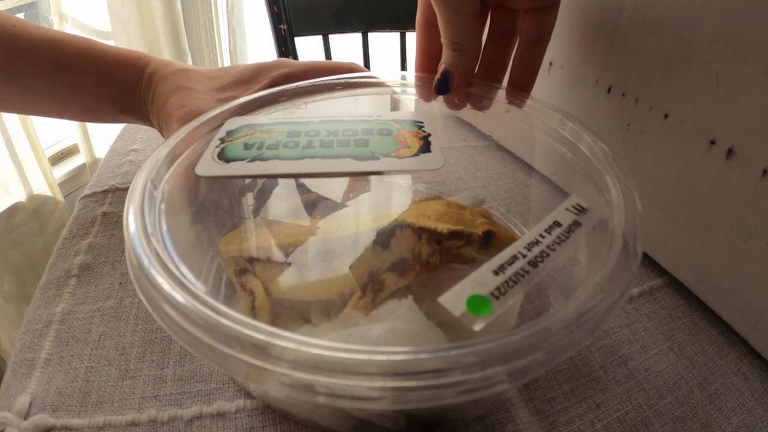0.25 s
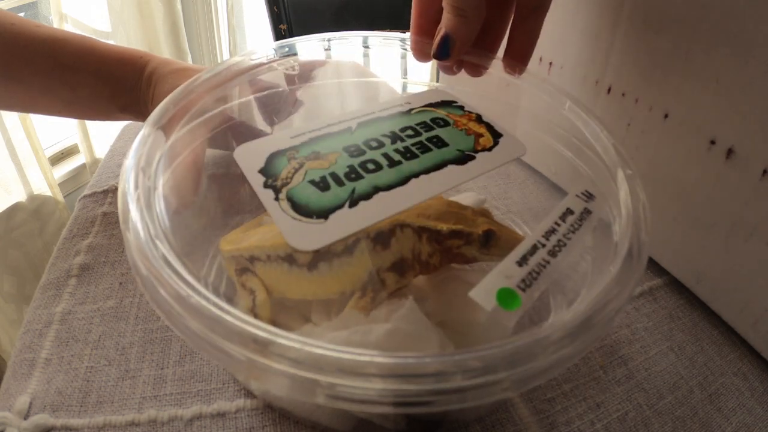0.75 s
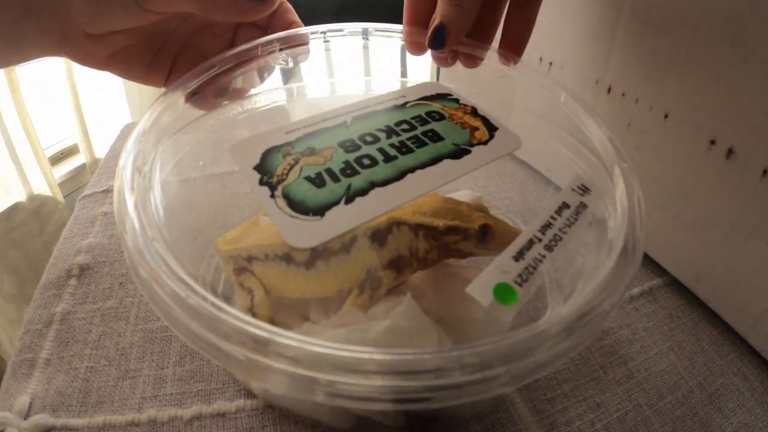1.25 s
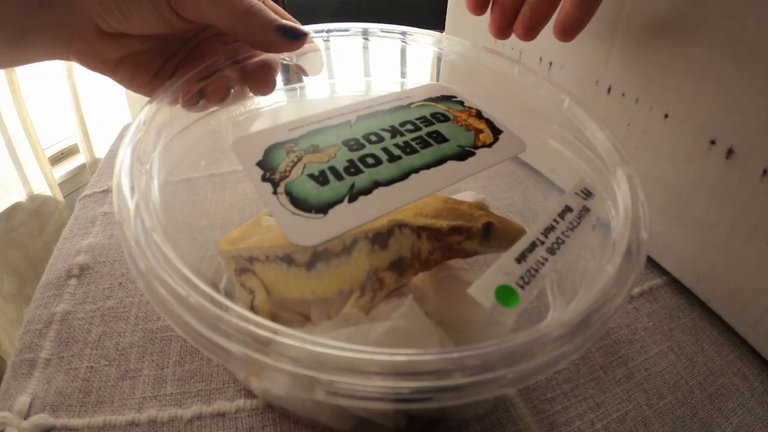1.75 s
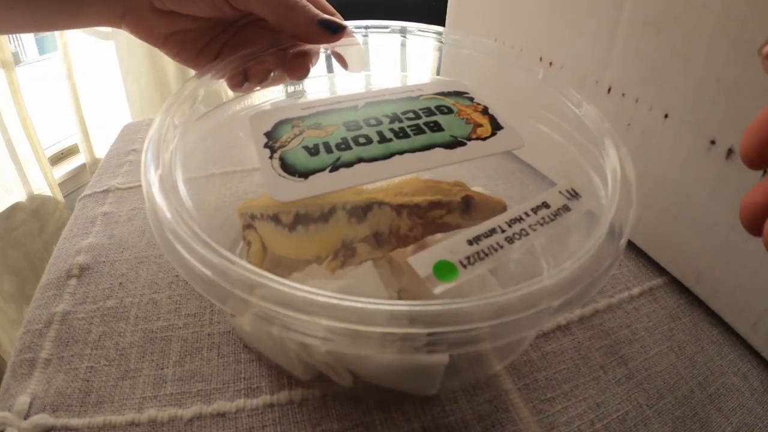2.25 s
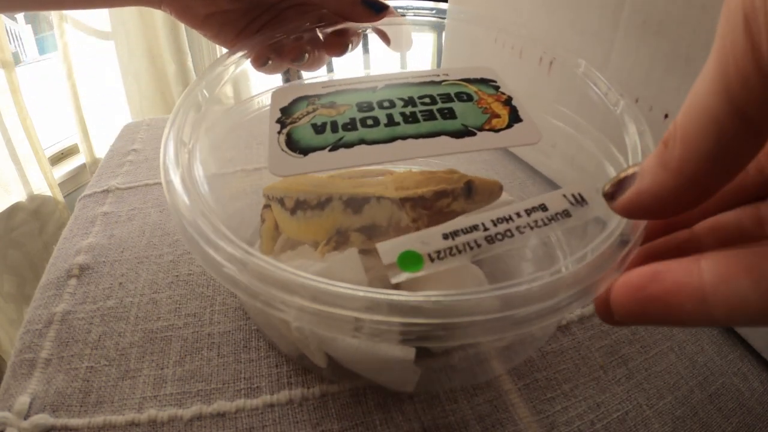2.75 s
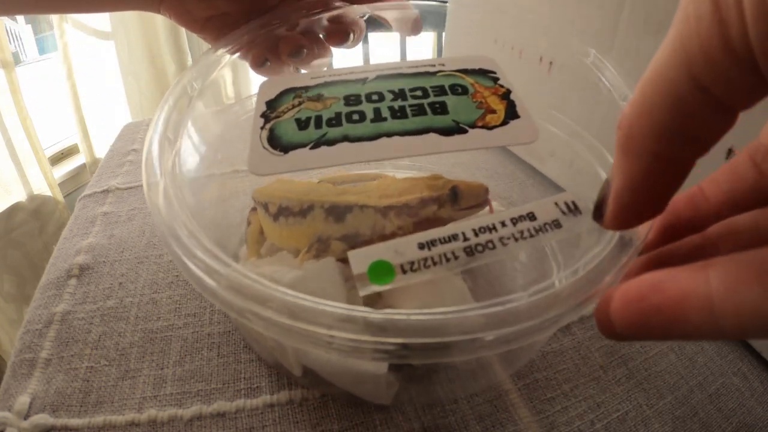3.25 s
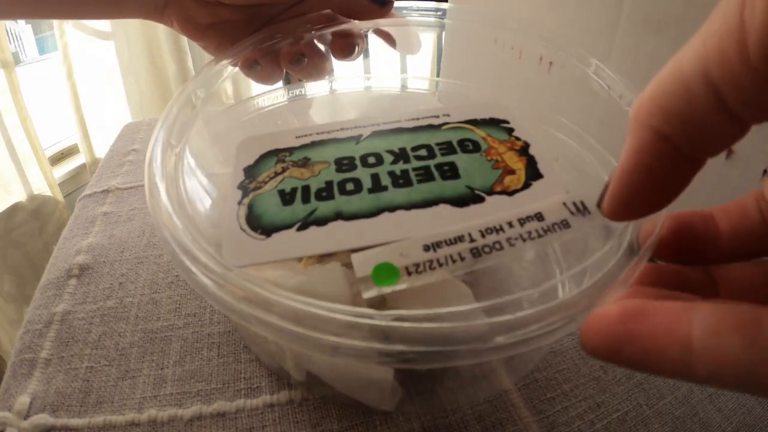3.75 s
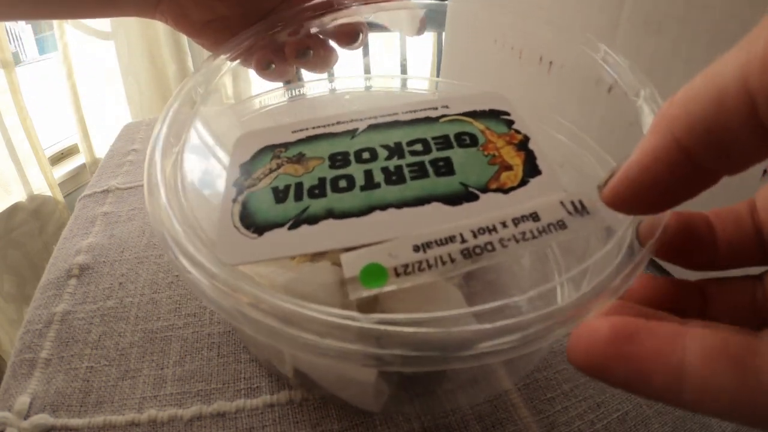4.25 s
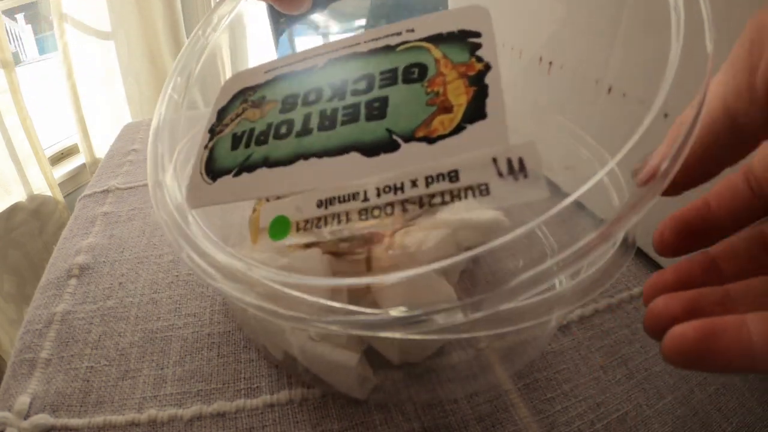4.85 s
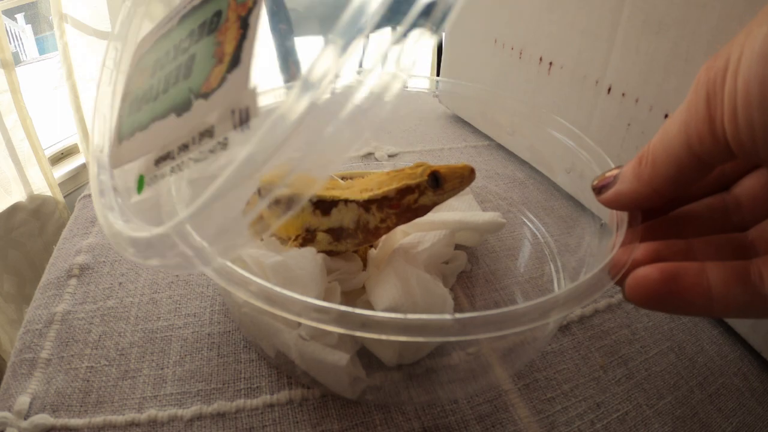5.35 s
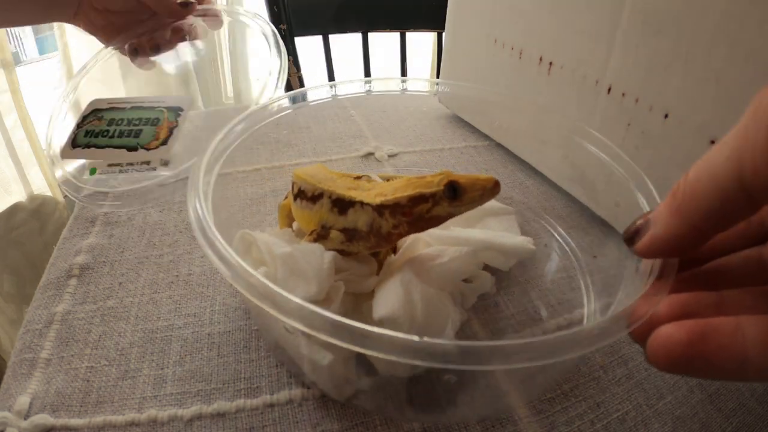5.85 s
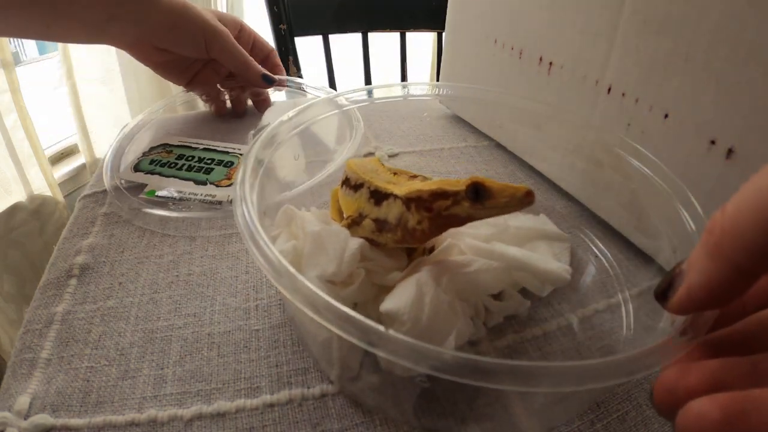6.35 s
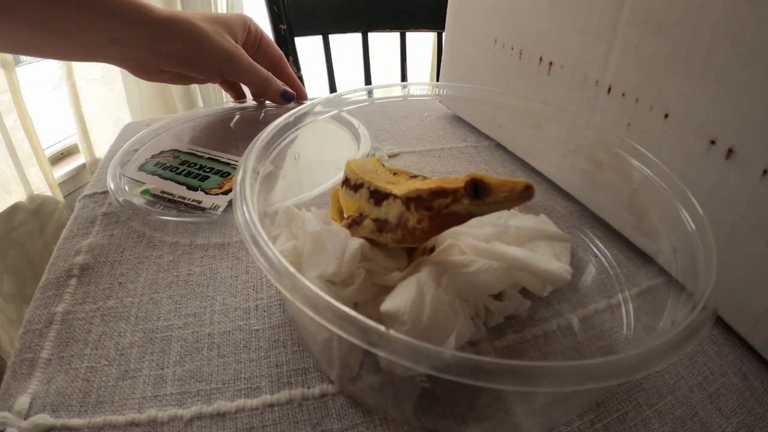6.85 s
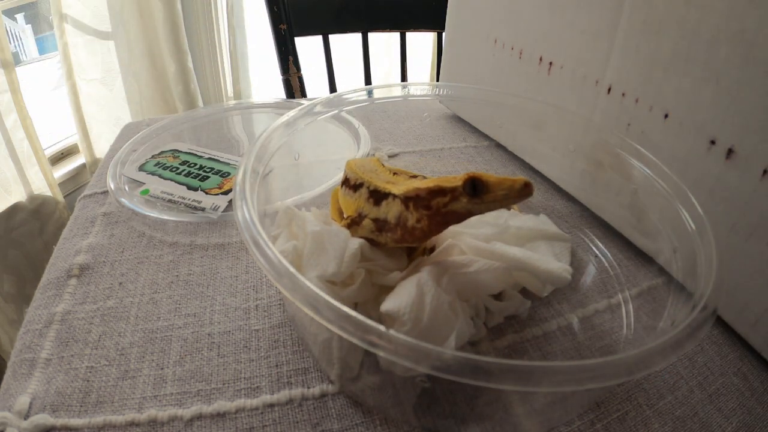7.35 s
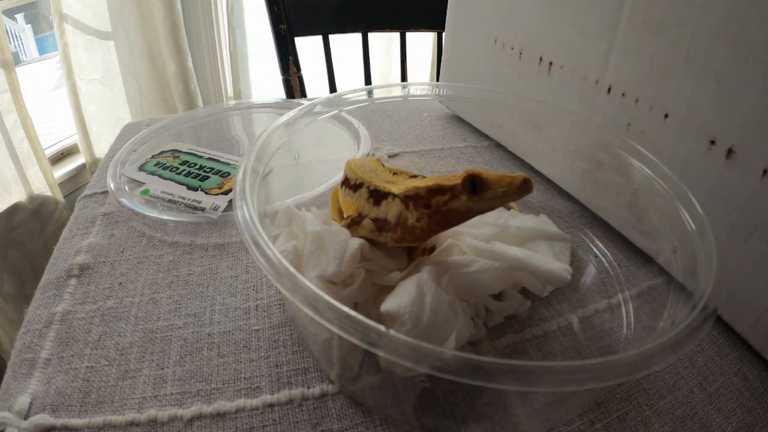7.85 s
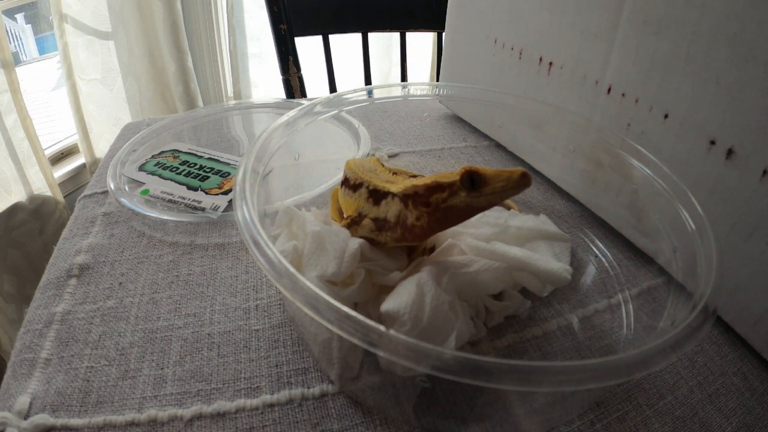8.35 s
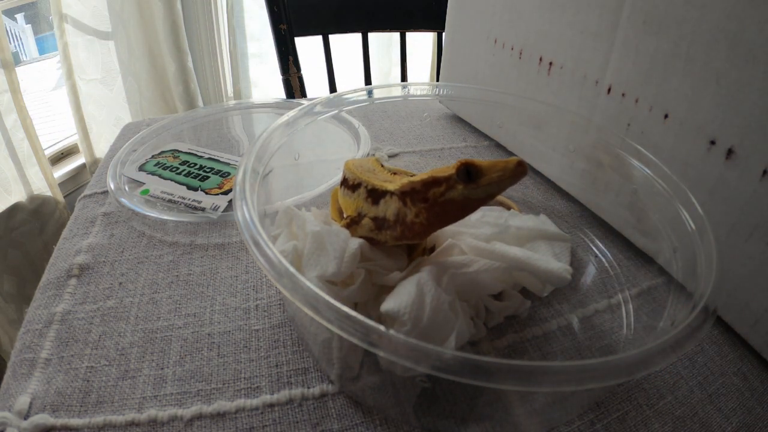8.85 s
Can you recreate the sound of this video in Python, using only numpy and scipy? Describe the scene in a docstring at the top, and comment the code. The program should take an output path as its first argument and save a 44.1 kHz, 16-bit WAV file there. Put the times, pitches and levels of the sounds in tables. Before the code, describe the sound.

Fingers turn a thin plastic tub on a cloth-covered table and pry its lid off with sharp snaps, hollow pops and gritty scrapes.

```python
"""Prying the lid off a plastic tub

Fingers turn a thin plastic tub on a cloth-covered table and pry its lid off, heard close up in stereo.
The rim snaps: noise bursts strike damped wall modes, and the air in the tub rings hollow.
Skin, plastic and cloth scrape as gritty filtered noise, low damped modes thud, narrow modes squeak.
Behind lie filtered room air and an appliance's wavering sines; a gain control ducks after loud pops."""
import sys
import numpy as np
from scipy import signal
from scipy.fft import rfft, irfft, next_fast_len
from scipy.io import wavfile
from scipy.ndimage import uniform_filter1d, map_coordinates

SR = 44100
rng = np.random.default_rng(int(sys.argv[2]) if len(sys.argv) > 2 else 0)


def to_wav(sig):
    """Store sig (one row per channel, or 1-D mono) as 16-bit WAV at the path in sys.argv[1].

    Samples outside -1..1 are clipped; the rate is SR.
    """
    pcm = np.clip(np.atleast_2d(sig), -1, 1) * 32767
    pcm = np.round(pcm).astype(np.int16)
    wavfile.write(sys.argv[1], SR, pcm.T)  # frames by channels


def nominal_scale(level):
    """Amplitude ratio for a level in decibels (scalar or array-like)."""
    x = np.asarray(level, float) / 20
    return 10 ** x


N = 400869  # length in samples

# the rim buckling, levels before the trims in the code:
# [t/s, crack level/dB, crack f/Hz, hollow ring over crack level/dB, treble over crack level/dB]
BUCKLES = [(0.1113, -29.5, 3300, -8.5, -6.5), (0.1485, -22.5, 1410, -8.5, -44), (0.15, -20, 2750, -24, -14),
           (0.195, -30.5, 1370, -2.5, -4), (0.2432, -34.5, 1330, 8, -19), (0.294, -31.5, 1297, 10.5, -10),
           (.4226, -59.5, 1370, 20.5, -11), (0.466, -35.5, 1188, 4.5, -15.5), (0.51, -46.5, 1066, 8, -20),
           (0.584, -32.5, 1190, 8, -19), (0.6202, -30, 1190, -2.5, -35.5), (0.6363, -11, 3015, -20.5, -18),
           (0.6387, -7.5, 1390, -4, -11.5), (0.6465, -20.5, 1266, -6.5, -25), (0.653, -25.5, 2220, 5, -25),
           (0.6664, -13, 2120, -1, -28), (0.6755, -25, 4900, -30, 3), (.737, -40, 2880, -17, -18),
           (0.9698, -31, 2800, -5.5, -21), (1.2136, -49, 2980, -8, -12.5),
           (1.4112, -26, 1644, -11.5, -13.5), (1.4208, -28.5, 1710, -8, -6), (1.539, -29, 5520, -30, -0.5),
           (1.557, -40, 5500, -30, 2), (1.5694, -24.5, 2460, 2, -32), (1.68, -32.5, 2956, -13, -13.5),
           (2.6964, -34.5, 1480, 3, -22.5), (2.799, -43.5, 1420, -5, -16), (2.84, -43, 1440, -14, 4),
           (2.9646, -32.5, 2200, -13, -20.5), (2.9966, -48, 1410, -6, -6), (3.1128, -46, 1500, -13, -7),
           (3.238, -36, 2126, -19, -23), (3.2792, -36, 2180, -8.5, -12), (3.361, -48, 1700, -25, -30),
           (3.421, -40, 2300, -13, -9), (3.4493, -49, 1740, -30, -18), (3.478, -43, 1490, 0.5, -17),
           (3.507, -30.5, 2120, -1, -26), (3.535, -58, 7500, -30, 5), (3.559, -48, 2940, -14, -4),
           (3.5907, -31.5, 1610, 2, -21), (3.698, -59, 7500, -30, 8), (3.708, -38, 1400, 2.5, -36),
           (3.7244, -38.5, 1700, 9.5, -30), (3.741, -43.5, 1370, 7.5, -21.5), (3.757, -39, 1770, 1, -19),
           (3.7927, -46.5, 1670, 0, -17), (3.834, -45.5, 2630, -3, -9), (3.8511, -40.5, 1757, -5.5, -21),
           (3.968, -20.5, 1830, -20, -6), (4.099, -16.5, 2790, -11, -5), (4.117, -49, 1980, -21.5, -18),
           (4.147, -53, 2530, -28, -1), (4.219, -11, 2980, -16, 3), (4.2308, -28, 2270, -4, -8),
           (4.2441, -19, 2117, -14, -31), (4.333, -48.5, 1700, -18.5, -17.5), (4.385, -45, 3270, -23, -15),
           (4.401, -47, 2800, -15, -15), (4.5193, -29.5, 2300, 5.5, -8), (4.6051, -23, 1470, 0.5, -16),
           (4.6254, -50, 1380, 14, 2), (4.6418, -19.5, 1983, -9, -9), (4.6758, -38, 1640, -1.5, -43),
           (4.805, -53, 1500, -11.5, -13), (4.858, -54.5, 1400, -1, -14), (4.885, -54, 1478, 4, -25),
           (5.133, -41.5, 1740, 1, -4), (5.226, -40.5, 1720, -2, -18.5), (6.0879, -45, 3160, -23, 11.5),
           (6.1564, -30.5, 3520, -25, -14), (6.2714, -27.5, 2830, -43, -35),
           (6.337, -40.5, 2510, -35, -2.5), (6.606, -34.5, 1740, -38, -33), (6.61, -34, 2980, -42, -35),
           (6.677, -43.5, 1699, -40, -26), (6.961, -43, 4500, -21, -7), (7.627, -51, 1372, -26, -27.5),
           (7.654, -47.5, 1240, -27, -24), (7.7505, -38, 2300, -14, 8), (7.771, -54, 1100, -25, -25),
           (7.79, -45.5, 1430, -26.5, -18), (8.047, -48, 1380, -8, -18), (8.083, -52, 1800, -7, -27),
           (8.0954, -43.5, 1410, -26.5, -28), (8.126, -39.5, 3920, -30, -12),
           (8.164, -43.5, 1110, -24, -26.5), (8.1951, -31.5, 4170, -20, -21),
           (8.2235, -41.5, 3920, -20.5, -12), (8.2356, -24, 3900, -28, -28),
           (8.2399, -29.5, 1500, -34, -21.5), (8.5382, -45, 1285, -28, -1)]


def snaps():
    """Each buckle: a burst of crack through the wall's modes, the air in the tub ringing, a fading shudder."""
    out, t = np.zeros((2, N + SR)), np.arange(SR // 8) / SR
    for start, db, crack_hz, hollow_db, treble_db in BUCKLES:
        crack = wall_crack(t, crack_hz, treble_db)
        hollow = tub_ring(t, start, db)
        sound = nominal_scale(db + 1.0) * (crack + nominal_scale(hollow_db + 6.0) * hollow)
        sound = sound + shudder(t, nominal_scale(db) * (0.33 * crack + nominal_scale(hollow_db + 5.5) * hollow))
        # each spot on the rim lies at its own distance from the two ports
        lag = rng.integers(1, 3)
        at = round(start * SR)
        out[0, at + lag:][:len(t)] += sound
        out[1, at:][:len(t)] += sound

    def radiation(hz):
        # a thin wall radiates no bass, soft plastic little top
        return (1j * hz / (1j * hz + 170)) ** 2 / (1 + 1j * hz / 13000)
    return filtered(out[:, :N], radiation)


def buckle_burst(t):
    """One clean jolt inside a ragged tear; the buckle takes a moment to run."""
    tear = rng.standard_normal(len(t)) * nominal_scale(-60 * t / .007) * (1 - np.exp(-t / .0006)) ** 2
    jolt = nominal_scale(-((t - .0009) / .00002) ** 2)  # 0.9 ms in, 1 dB down 0.02 ms to either side
    return .65 * tear / np.abs(tear).max() + jolt


# modes of the lid wall: [f/Hz, width/Hz, relative level/dB]
WALL_MODES = [(740, 150, -7.5), (1160, 430, -14.5), (1593, 950, -10), (2300, 550, 2), (2827, 687, 5.5),
              (3700, 1100, -4), (5000, 3200, 17.5), (7200, 1000, -7), (12000, 2100, -8)]


def wall_crack(t, crack_hz, treble_db):
    """The burst strikes the wall's damped modes; a crisp buckle drives the high ones harder."""
    burst = buckle_burst(t)
    modes = 0.38 * ring(crack_hz, 0.01, t, 0.0002)
    for hz, width, level in WALL_MODES:
        # modes near the buckle's own pitch are driven hardest
        drive_db = level + 2.0 * rng.standard_normal() - 11.2 * abs(np.log2(hz / crack_hz))
        if hz > 3300:
            drive_db += treble_db + 27.0
        decay = np.exp(-np.pi * width * t) * (1 - np.exp(-t * hz))
        modes = modes + nominal_scale(drive_db) * np.sin(2 * np.pi * hz * t) * decay
    wall = np.convolve(burst[:300], modes)[:len(t)]
    return wall / np.abs(wall).max() + nominal_scale(treble_db - 8) * np.diff(burst, prepend=0)


# the air in the tub rings higher as the gap under the lid widens: [t/s, f/Hz]
TUB_PITCH = [(0, 400), (.15, 567), (.2, 492), (.245, 462), (.295, 538), (.42, 514), (.47, 482), (.51, 448),
             (.585, 574), (.62, 507), (.64, 555), (1, 562), (1.41, 491), (1.5, 590), (2.7, 577), (2.8, 694),
             (3.28, 690), (3.5, 620), (3.6, 597), (3.71, 452), (3.76, 460), (3.97, 640), (4.1, 580),
             (4.52, 600), (4.6, 530), (4.64, 612), (5.2, 471), (9, 520)]
# modes of that air: [f over the main ring, share, t60/s]
AIR_MODES = [(.95, 1.1, 0.03), (1.13, 0.6, .03), (1.5, .25, 0.016), (.76, 0.19, 0.035), (2.3, 0.1, 0.014)]
RISE_PER_DB, FIRM_DB = .015, -28  # a harder buckle flexes the lid open: share of pitch per dB above firm
TUB_SCATTER = .02  # each spot on the rim shifts the ring a little: share of pitch


def tub_ring(t, start, db):
    """The enclosed air answers a buckle with a few damped modes."""
    rise = RISE_PER_DB * max(db - FIRM_DB, 0) + TUB_SCATTER * rng.standard_normal()
    main_hz = np.interp(start, *np.transpose(TUB_PITCH)) * (1 + rise)
    return sum(share * nominal_scale(2.0 * rng.standard_normal()) * ring(main_hz * ratio, t60, t, 0.0017)
               for ratio, share, t60 in AIR_MODES)


def shudder(t, blow):
    """The loose lid shudders on after a buckle: fading noise rings with the blow's first 5 ms."""
    rattle = rng.standard_normal(len(t)) * nominal_scale(-60 * t / .1) * (1 - np.exp(-t / 0.0052))
    return nominal_scale(-33.5) * signal.fftconvolve(rattle, blow[:SR // 200])[:len(t)]


# the tub or a hand landing on the table, level before a trim: [t/s, level/dB, f/Hz, t60/s]
LANDINGS = [(.112, -38.5, 147, 0.046), (0.191, -35, 199.5, 0.051), (0.294, -28.5, 216.4, 0.032),
            (0.639, -13, 152.3, 0.03), (0.65, -28, 70, 0.17), (0.659, -35.5, 38.06, 0.2),
            (0.669, -22.5, 167.3, 0.022), (0.681, -23.5, 148, 0.042), (0.972, -48.5, 150, 0.059),
            (1.426, -39.5, 200, 0.031), (1.456, -41, 91, 0.051), (1.573, -41.5, 100.7, 0.098),
            (1.715, -52.5, 80, 0.089), (3.282, -50, 169, 0.0414), (3.477, -46.5, 169.3, 0.16),
            (3.592, -35, 157.7, 0.06), (3.608, -42, 120, 0.14), (3.708, -40.5, 119.5, 0.0523),
            (3.728, -27, 72.4, 0.047), (3.758, -40, 60, 0.024), (3.998, -68, 100.3, 0.12),
            (4.218, -46, 149.8, 0.1), (4.25, -46.5, 75.4, 0.14), (4.5, -50.5, 60, 0.12),
            (4.519, -48, 238, 0.17), (4.621, -48.5, 70.3, 0.11), (4.607, -40, 165, 0.033),
            (5.135, -44.5, 77, 0.12), (5.168, -41, 79, 0.07), (5.224, -48.5, 118.6, 0.034),
            (6.159, -39.5, 145, 0.096), (7.86, -59.5, 61.93, 0.18), (6.608, -48, 139.6, 0.098),
            (8.196, -42.5, 293, 0.026)]


def thuds():
    """Soft contacts shake the table top: a low damped mode and a fainter one above it."""
    out, t = np.zeros(N + SR), np.arange(SR // 3) / SR
    for start, db, hz, t60 in LANDINGS:
        blow = ring(hz, t60, t, 0.00068) + 0.32 * ring(hz * 2.1, t60 * 0.95, t, 0.0029)
        out[round(start * SR):][:len(t)] += nominal_scale(db + 7.0) * blow
    return out[:N]


# spectra of the rubbing layers: [f/Hz, relative level/dB]
SCRAPE_COLOUR = [(600, -34), (1200, -9.5), (1800, -1.5), (2400, -1.5), (3300, -1.5), (4200, -6.5),
                 (6000, -38)]
FIZZ_COLOUR = [(2800, -50), (4200, -5), (5500, -11), (7500, -7.5), (10000, -16), (12500, -30),
               (15500, -41.5)]
CLOTH_COLOUR = [(2800, -43.5), (4200, -6.5), (6000, -6.5), (8000, -10), (10500, -17.5), (13000, -23.5),
                (15500, -40.5)]  # soft hiss of the weave
HOLLOW_COLOUR = [(90, -42), (150, 4.5), (280, 3.5), (450, 6), (600, 3.5), (750, -6.5), (1100, -8),
                 (1600, -4.5), (2500, -41)]
TABLE_COLOUR = [(15, -15), (35, 12), (70, -4), (130, 9.5), (220, -59)]
# sounds on the table: [f/Hz, left-right likeness]
NEAR_LIKENESS = [(60, 0.9), (1000, 0.89), (4000, 0.33), (12000, 0.63)]
# the place of contact sets where the rubbed plastic sings: [t/s, f/Hz]
CONTACT_PITCH = [(0, 1640), (.1, 1680), (.3, 1430), (.86, 1660), (0.948, 2696), (1.42, 1453), (1.49, 1542),
                 (1.52, 1690), (1.55, 1700), (1.6, 1494), (1.75, 2820), (2.63, 1490), (2.899, 2060),
                 (3.25, 2100), (3.42, 2180), (3.53, 2170), (3.65, 1610), (4.0, 2330), (4.5, 2300),
                 (4.599, 1730), (5.2, 1930), (5.4, 2850), (6.05, 3200), (6.09, 2500), (6.2, 2450),
                 (6.34, 2500), (6.5, 2376), (6.6, 2450), (6.7, 2300), (6.8, 2300), (7.0, 2821), (7.4, 1514),
                 (8.2, 1540)]
# faint stirring between strokes: [level/dB] of scrape, brightness, hollow body
STIRRING = [-102.5, -88.5, -67.5]
SHEEN_HZ = 5400  # upper resonance of the rubbed plastic
RUMBLE_DB, RUMBLE_GROWS, RUMBLE_S = -88, 1.9, 0.11  # table at rest, dB per dB of hollow body, averaging time
LET_GO_S = 6.4  # the hands stop pushing the tub about; the table lies still
WALL_DB, WALL_SHARP = -2.5, 0.47  # wall modes in a scrape: height over flat, width over a struck mode's


def rubs():
    """Skin, plastic and cloth slide in uneven slips; tub and table take up the motion."""
    quick = skids()
    slow = nominal_scale(STIRRING)[:, None] ** 2 + strokes()
    scrape, hollow = np.sqrt(quick + slow)[::2]
    fizz, cloth = np.sqrt(quick[1]), np.sqrt(slow[1])

    # the table follows the hollow body sluggishly, and by 36 dB at most
    load_db = 20 * np.log10(uniform_filter1d(hollow, size=round(RUMBLE_S * SR)) / nominal_scale(STIRRING[2]))
    pushed = np.arange(N) < LET_GO_S * SR
    table_db = RUMBLE_DB + 36 * np.tanh(RUMBLE_GROWS * load_db / 36) * pushed
    grip_db = 1.9 * wobble(60) + 2.3 * wobble(250)

    def wall(f):
        return 1 + sum(nominal_scale(WALL_DB) / (1 + ((f - hz) / (WALL_SHARP * width)) ** 2)
                       for hz, width, _ in WALL_MODES)
    creak_noise = unit(filtered(rush(SCRAPE_COLOUR, NEAR_LIKENESS, 1200, 5), wall))
    creak_noise = sung(creak_noise, CONTACT_PITCH, octaves=0.15, peak_db=0.5, below_db=18.5, patchy_db=2.5)
    fizz_noise = sung(rush(FIZZ_COLOUR, NEAR_LIKENESS, 540, 5.8), [(0, SHEEN_HZ)],
                      octaves=0.22, peak_db=10, below_db=2.5, patchy_db=3.0)
    cloth_noise = rush(CLOTH_COLOUR, NEAR_LIKENESS, 300, 5.8)
    hollow_noise = rush(HOLLOW_COLOUR, NEAR_LIKENESS, 120, 16.0)
    table_noise = rush(TABLE_COLOUR, NEAR_LIKENESS)

    out = scrape * nominal_scale(grip_db) * creak_noise
    out = out + fizz * nominal_scale(grip_db + 1.2 * wobble(89)) * fizz_noise
    out = out + cloth * nominal_scale(0.6 * wobble(23)) * cloth_noise
    out = out + hollow * nominal_scale(0.13 * grip_db + 1.1 * wobble(53)) * hollow_noise
    return out + nominal_scale(table_db + 5.1 * wobble(9.1)) * table_noise


# short skids of skin or rim:
# [t/s, length/s, scrape level/dB, brightness over scrape level/dB, hollow body over scrape level/dB]
SHORT_SKIDS = [(0.091, 0.014, -60, 2, 17), (0.19, 0.011, -44.5, -8.5, 8.5), (0.206, 0.027, -61, -1, -8),
               (0.276, 0.027, -69, 1.5, -10), (0.363, 0.023, -69.5, 0.5, 20), (0.635, 0.03, -34.5, -6, 8),
               (0.659, 0.031, -38.5, -3.5, 9.5), (0.679, 0.082, -53, -8, 14),
               (.745, 0.086, -61.5, -13.5, 6), (0.782, 0.035, -72, 2, -1), (0.82, 0.045, -67, 0, 7),
               (0.959, 0.029, -51, -8.5, -1), (0.99, 0.028, -59.5, -9, 7.5), (1.409, 0.075, -50, -12, -1),
               (1.509, 0.044, -50.5, 4.5, -1.5), (1.552, 0.024, -54.5, 4, -12),
               (1.667, 0.054, -62, 2.5, -12), (2.9, 0.065, -54, -3, 4.5), (2.965, 0.02, -61, -12, 4),
               (3.21, 0.15, -68.5, -22, 3), (3.39, 0.021, -66, -17, -4), (3.239, 0.0278, -60, -4, 8),
               (3.269, 0.032, -61.5, -17, 7), (3.417, 0.028, -64, -2, 1), (3.48, 0.051, -64, -10, 15.5),
               (3.493, 0.042, -57, -14.5, 13.5), (3.57, 0.025, -58, -1, 6.5),
               (3.589, 0.014, -48, -10, -1.5), (3.603, 0.0431, -56, -3.5, 10), (3.7, 0.074, -59, -5, 14.5),
               (3.842, 0.062, -63.5, -7, 6.5), (3.991, 0.054, -45.5, -2.5, -0.5),
               (3.998, 0.028, -37.5, -2, -21), (4.03, 0.032, -61, -2, 8.5), (4.052, 0.0098, -40.5, -8, -5),
               (4.071, 0.0072, -52.5, 1, 6), (4.185, 0.021, -68, 4, 13.5), (4.203, 0.059, -49.5, -2, 8),
               (4.223, 0.0062, -41, 9, -18), (4.241, 0.013, -35, -18, -17.5),
               (4.257, 0.051, -47.5, -15, -10), (4.353, 0.022, -53.5, -14, -16), (4.373, 0.024, -62, -5, 2),
               (4.353, 0.099, -74.5, -2, 19.5), (4.483, 0.03, -54, -11, 4),
               (4.51, 0.0086, -39, -13.5, -5.5), (4.585, 0.022, -54, -10, -2), (5.121, 0.05, -56, -5, 3.5),
               (5.248, 0.021, -66, -6, 1.5), (5.393, 0.067, -63, -3.5, -17),
               (6.01, 0.045, -54.5, -2, -20.5), (6.11, 0.099, -57.5, 1.5, -12),
               (6.189, 0.18, -54, -1.5, -27), (6.287, 0.096, -50.5, -11, -21),
               (6.32, 0.062, -50.5, -6, -25.5), (6.445, 0.032, -59, -3, -18.5),
               (6.462, 0.037, -47.5, -7.5, -23), (6.494, 0.037, -46, -2, -20),
               (6.52, 0.121, -52, -7.5, -34), (6.626, 0.16, -60, 1.5, -29.5),
               (6.664, 0.1, -53.5, -10.5, -31.5), (6.792, 0.072, -63, -5.5, -21),
               (6.939, 0.072, -68.5, -1.5, -11.5), (7.52, 0.128, -73, -14, -1.5), (7.62, 0.052, -75, 0, -8),
               (7.705, 0.03, -64.5, -4, 1), (8.093, 0.077, -68, -14, -9.5), (8.118, 0.046, -66, 1.5, -11.5),
               (8.22, 0.012, -50.5, -13, -3), (8.232, 0.019, -46.5, -6.5, 2.5)]
EDGE_S, EDGE_SHARE = 0.0024, 0.093  # grip and release time; longer skids add this share of their length
SKID_TOP, SKID_SAG_DB = 0.36, 11.5  # loudest point 0-1, fall over a whole length


def skids():
    """Power of scrape, brightness and hollow body during each skid: a quick grip, a swell, a quick release."""
    power = np.zeros((3, N))
    for start, length, db, fizz_db, hollow_db in SHORT_SKIDS:
        u = np.linspace(0, 1, round(length * SR))
        edge = EDGE_S + EDGE_SHARE * length
        shape = np.clip(np.minimum(u, 1 - u) * length / edge, 0, 1)
        shape = shape * nominal_scale(-SKID_SAG_DB * abs(u - SKID_TOP))
        levels = nominal_scale([[db], [db + fizz_db], [db + hollow_db]])
        at = round(start * SR)
        power[:, at:at + len(u)] += (levels * unit(shape)) ** 2
    return power


# slow strokes of hands, tub and lid over the cloth:
# [t/s, length/s, scrape level/dB, brightness over scrape level/dB, hollow body over scrape level/dB]
SLOW_STROKES = [(-.12, 0.294, -49.5, -15.5, 8.5), (0.101, 0.31, -68, -7, 8.5),
                (0.332, 0.31, -86, -13.5, 23.5), (0.6, 0.19, -58.5, -14, 10), (0.848, 0.21, -68, -1.5, 3),
                (1.384, 0.27, -56.5, -9.5, -0.5), (1.661, 0.092, -66, -5, 12), (1.95, 1, -75, 5, 6.5),
                (2.836, 0.477, -74.5, 0, 8), (3.13, 0.782, -70, -2.5, 9.5), (3.79, 0.47, -63, -10, 5.5),
                (4.191, 0.19, -58.5, -10.5, 2), (4.395, 0.4555, -64, -1, 4.5), (4.692, 0.47, -75.5, 3, 7),
                (5.076, 0.25, -70, -5.5, 6.5), (5.393, 1, -75, 2.5, -20), (5.964, 0.52, -58.5, -3.5, -7.5),
                (6.344, 0.51, -53, -15, -34), (7.39, 0.32, -69, -7.5, 3.5), (7.565, 0.336, -71, 1.5, 10),
                (8.046, 0.14, -68, -12, 3), (8.094, 0.24, -59.5, -4.5, -0.5), (8.451, 0.52, -83, -3, 13)]


def strokes():
    """Power of the same three layers during each stroke: one smooth swell."""
    power = np.zeros((3, N))
    for start, length, db, fizz_db, hollow_db in SLOW_STROKES:
        at = np.arange(max(round(start * SR), 0), round((start + length) * SR))
        # a higher exponent makes a more peaked swell
        swell = np.sin(np.pi * (at / SR - start) / length).clip(0) ** 1.1
        levels = nominal_scale([[db], [db + fizz_db], [db + hollow_db]])
        power[:, at] += (levels * swell) ** 2
    return power


def sung(x, path, octaves, peak_db, below_db, patchy_db):
    """x through a resonance on the (s, Hz) path, thin below it; narrow wall modes come and go."""
    hz, t, z = signal.stft(x, SR, nperseg=512)
    off = np.log2((hz[:, None] + 1) / np.interp(t, *np.transpose(path)))  # octaves from the path
    patches = uniform_filter1d(rng.standard_normal(off.shape), size=2, axis=0)
    patches = unit(uniform_filter1d(patches, size=9, axis=1))
    resonance = 1 + nominal_scale(peak_db) / (1 + (off / octaves) ** 2)
    gain = resonance * nominal_scale(below_db * np.clip(off + 0.2, -.7, 0) + patchy_db * patches)
    # hold the overall level while the colour moves
    share = np.mean(abs(z) ** 2, axis=(0, 2))[:, None]
    gain = gain / np.sqrt(np.sum(share * gain ** 2, axis=0) / share.sum())
    return signal.istft(z * gain, SR, nperseg=512)[1][:, :N]


# a nail or the rim catches and one wall mode squeaks: [t/s, length/s, f/Hz, level/dB]
CATCHES = [(0.062, 0.07, 1650, -56), (1.426, 0.072, 3000, -54.5), (3.202, 0.13, 2189, -65.5),
           (3.384, .04, 2043, -58.5), (3.51, 0.021, 2200, -53), (5.25, 0.0174, 1650, -66),
           (5.409, 0.0283, 2450, -64.5), (6.289, .07, 1090, -70), (6.482, .05, 1040, -69),
           (6.659, 0.114, 3360, -54.5), (8.085, 0.093, 1480, -64)]


def squeaks():
    """Uneven slips keep one narrow mode singing under a smooth swell."""
    out = np.zeros(N)
    for start, length, hz, db in CATCHES:
        t = np.arange(round(length * SR)) / SR
        mode = np.sin(2 * np.pi * hz * t) * np.exp(-np.pi * 110 * t)  # 110 Hz wide
        sing = signal.fftconvolve(rng.standard_normal(len(t)), mode)[:len(t)]
        swell = np.sqrt(np.sin(np.pi * t / length).clip(0))
        out[round(start * SR):][:len(t)] += nominal_scale(db) * unit(sing * swell)
    return out


# decay of the room: [f/Hz, t60/s]
ROOM_DECAY = [(150, 0.29), (1000, 0.1), (4000, 0.072), (12000, 0.091)]


def room(x):
    """The room's answer: decaying noise 3 ms behind, a fresh tail for every half second."""
    out, step, delay = np.zeros((2, N + SR)), SR // 2, 130
    for start in range(0, N, step):
        hz, t, z = signal.stft(rng.standard_normal((2, SR // 2)), SR, nperseg=256)
        decay = nominal_scale(-60 * t / along(ROOM_DECAY, hz)[:, None])
        tail = signal.istft(z * decay, SR, nperseg=256)[1]
        tail = tail / np.linalg.norm(tail[0])
        wet = signal.fftconvolve(x[None, start:start + step], tail, axes=1)
        at = start + delay
        out[:, at:at + wet.shape[1]] += wet[:, :N + SR - at]
    return out[:, :N]


# spectrum of the room air: [f/Hz, relative level/dB]
AIR_COLOUR = [(15, -57), (25, -13.5), (66, -17.5), (107, -29.5), (169, 2), (260, -8), (297, -11.5),
              (331, -40.5), (523, -41), (666, -33), (2700, -30.5), (3000, -27.5), (3720, -34.5),
              (7500, -36.5), (15500, -60.5)]
# room air: [f/Hz, left-right likeness]
AIR_LIKENESS = [(60, 0.94), (240, 0.93), (950, 0.42), (3770, 0.24), (15000, 1)]
# an appliance's partials: [f/Hz, level/dB, pitch waver/Hz, flutter knots per s]
HUM_PARTIALS = [(178.2, -70.5, 3, 8), (300.7, -73, 2.3, 9.1), (529, -70, 1.96, 21), (597, -85.5, 3.3, 18),
                (2980, -81.5, 35, 180)]
AIR_DB, DRAUGHT_DB, FLUTTER_DB = -62, 1, 2.2  # air level, unsteadiness of the air and of the hum


def air():
    """Room air as filtered noise, and an appliance's wavering hum and whine as sines."""
    hum = np.zeros(N)
    for hz, db, waver_hz, rate in HUM_PARTIALS:
        phase = 2 * np.pi * np.cumsum(hz + waver_hz * wobble(40)) / SR
        hum += np.sqrt(2) * nominal_scale(db + FLUTTER_DB * wobble(rate)) * np.sin(phase)
    return nominal_scale(AIR_DB + DRAUGHT_DB * wobble(3.8)) * rush(AIR_COLOUR, AIR_LIKENESS) + hum


def unit(x):
    """Scaled to rms 1."""
    return x / np.sqrt(np.mean(x ** 2) + 1e-20)


def along(points, hz):
    """(Hz, value) points read on a log axis."""
    f, v = np.transpose(points)
    return np.interp(np.log(hz + 1), np.log(f + 1), v)


def filtered(x, response):
    """x times a response of frequency."""
    m = next_fast_len(N + SR // 2)
    return irfft(rfft(x, m) * response(np.fft.rfftfreq(m, 1 / SR)), m)[..., :N]


def wobble(rate):
    """A smooth random curve, rate knots a second."""
    knots = rng.standard_normal(int(N * rate / SR) + 4)
    return map_coordinates(knots, [np.arange(N) * rate / SR])


def ring(hz, t60, t, attack):
    """One damped mode."""
    return np.sin(2 * np.pi * hz * t) * nominal_scale(-60 * t / t60) * (1 - np.exp(-t / attack))


def rush(spectrum, alike, rate=0, grain_db=0):
    """Stereo noise of rms 1; sparse slips of random size, rate a second, ride on it."""
    pair = rng.standard_normal((2, N))
    size_db = grain_db + 3 * np.minimum(rng.exponential(size=N), 3)
    slips = (rng.random(N) < rate / SR) * nominal_scale(size_db) * rng.choice([-1, 1], N)
    return unit(spread(pair + slips, alike, spectrum))


def spread(pair, alike, spectrum=((1, 0), (2, 0))):
    """Two signals coloured and mixed as mid and side to a left and right of the given likeness."""
    def mid_side(hz):
        turn = np.arccos(np.clip(along(alike, hz), -1, 1)) / 2
        return nominal_scale(along(spectrum, hz)) * [np.cos(turn), np.sin(turn)]
    mid, side = filtered(pair, mid_side)
    return np.array([mid + side, mid - side])


# spread-out sounds at the microphone ports: [f/Hz, phase by which left leads/rad]
PORT_LEAD = [(0, 0), (550, -0.7), (900, -.8), (3000, -.75), (5000, -.05), (15300, 0)]


def scene():
    """Near sounds a little to the right, their room, and spread-out rubbing and air, late at the left port."""
    hits = snaps() + thuds() + squeaks()
    side = np.array([[1], [-1]])
    wide = filtered(rubs() + air(), lambda hz: np.exp(1j * side * along(PORT_LEAD, hz) / 2))
    wet = nominal_scale(-14.0) * spread(room(hits.mean(axis=0)), NEAR_LIKENESS)
    return hits * nominal_scale([[-.8], [.8]]) + wet + wide


def band_limit(x):
    """A steep low-pass at the top of the band."""
    return signal.sosfilt(signal.butter(12, 15740, fs=SR, output="sos"), x)


# microphone ports: [f/Hz, left over right level/dB]
PORT_LEAN = [(60, -1), (180, 0), (550, -0.5), (1650, -0.5), (4970, 2), (15000, -4.5)]


def record(dry):
    """Gain control recovers slowly after loud pops; the ports differ a little; the top octave fades."""
    keep = np.exp(-1 / (.25 * SR))  # 0.25 s recovery
    power = np.pad(np.mean(dry ** 2, axis=0), (1500, 0))[:N]  # reacts 34 ms late
    recent = signal.lfilter([1 - keep], [1, -keep], power)
    ducked = dry * (1 + recent / nominal_scale(-32.5) ** 2) ** -.25
    side = np.array([[1], [-1]])
    ports = filtered(ducked, lambda hz: nominal_scale(side * along(PORT_LEAN, hz) / 2) / np.sqrt(1 + (hz / 11500) ** 9))
    ports = ports / (1 + np.abs(ports / .7) ** 3) ** (1 / 3)  # the loudest peaks round off
    return band_limit(ports)


dry = scene()
out = record(dry)
to_wav(out)
```